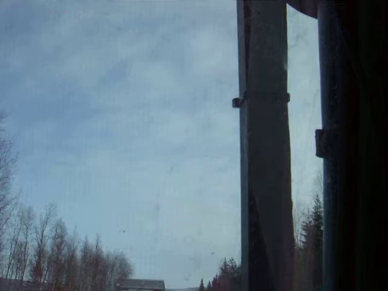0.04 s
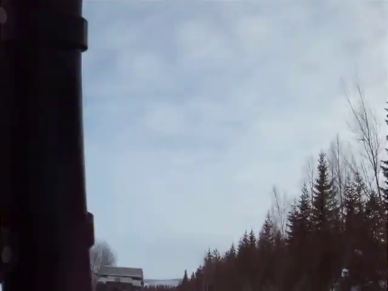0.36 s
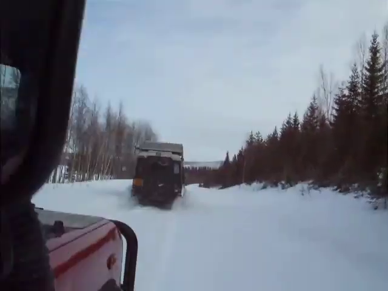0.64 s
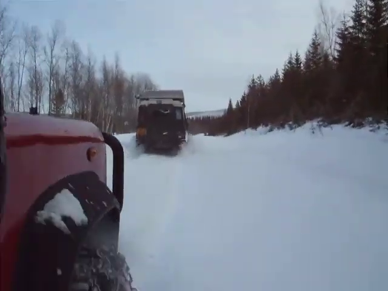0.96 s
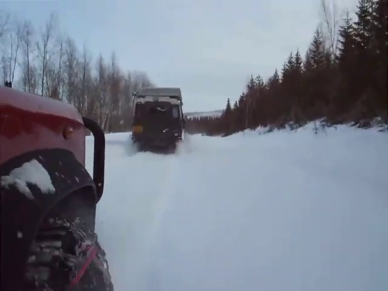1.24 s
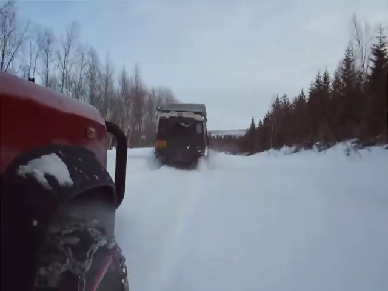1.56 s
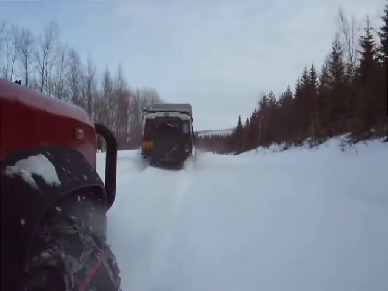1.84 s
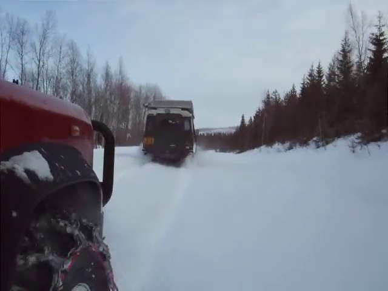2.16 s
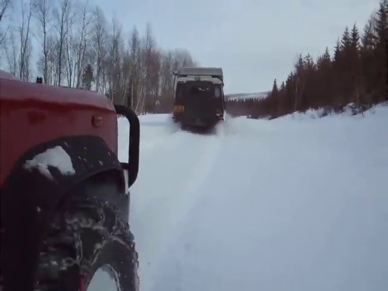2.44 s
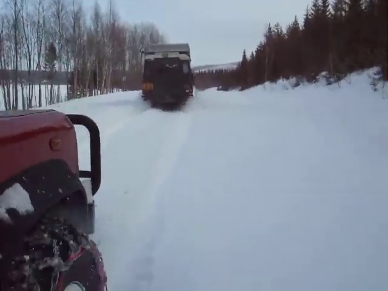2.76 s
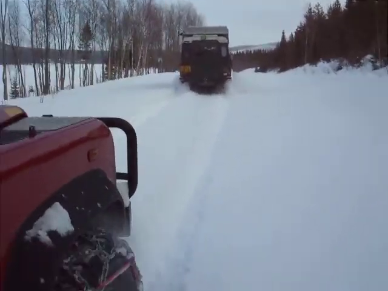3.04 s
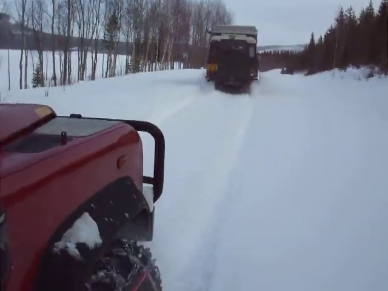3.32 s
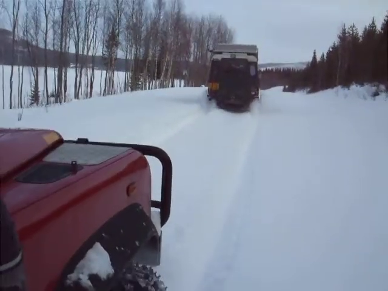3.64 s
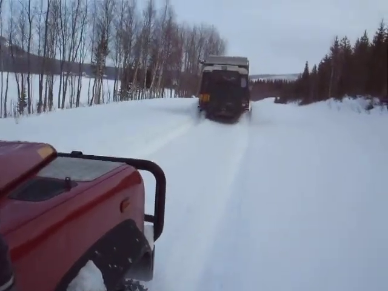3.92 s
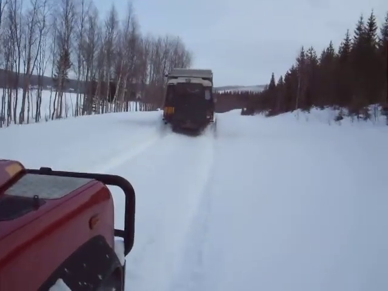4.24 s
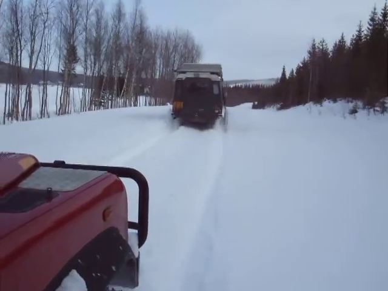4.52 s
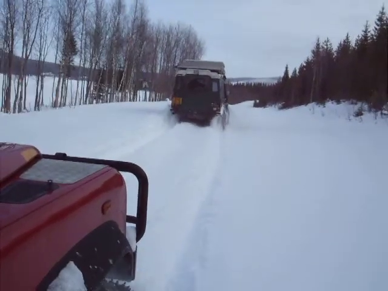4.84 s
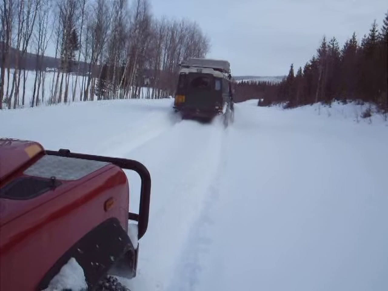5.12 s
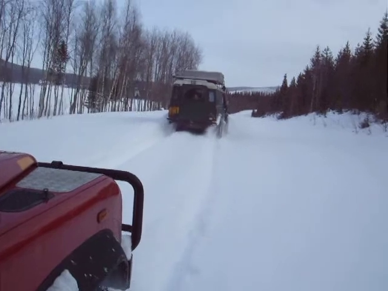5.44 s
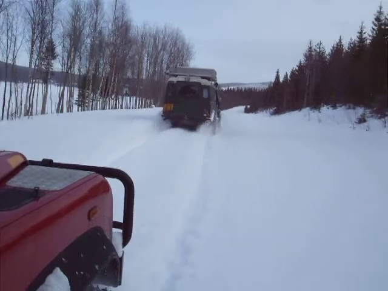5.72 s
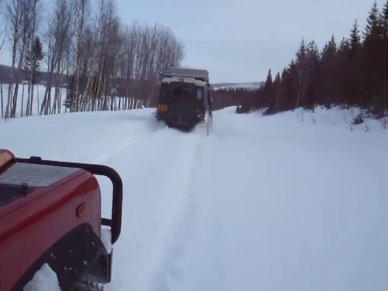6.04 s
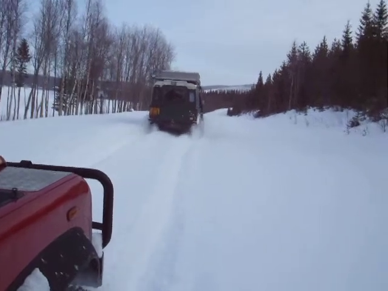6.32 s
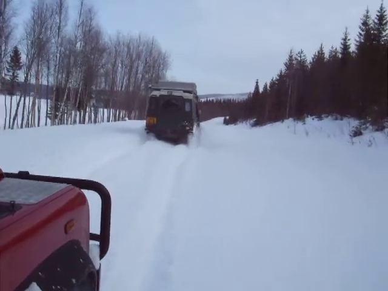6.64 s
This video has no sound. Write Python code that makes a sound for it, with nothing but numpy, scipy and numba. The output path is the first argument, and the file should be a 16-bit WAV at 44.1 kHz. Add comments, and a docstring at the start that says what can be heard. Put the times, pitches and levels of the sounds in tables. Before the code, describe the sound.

At the open window of an off-road vehicle on a snowy track, a diesel engine hums and rattles steadily, wavering against the low tone of a truck ahead. A sharp tick comes first, then a rush of air and heavy wind buffeting on the microphone. As the gusts thin out, the engine drops a little in pitch and works harder, and the hiss of snow thrown by chained tyres builds.

```python
"""In deep snow, at the open side window of a five-cylinder diesel off-roader that drones along.
The periodic firing gives an exhaust hum, which beats against the tone of a truck ahead.
Knocks excite the modes of the engine block, the gears whine faintly and chained tyres spray snow.
Turbulent air rushes past the window frame and buffets the microphone, whose limiter ducks the rest.
A few sharp ticks and two faint, very high clicks are also heard."""
import sys
import numpy as np
from scipy import signal
from scipy.fft import rfft, irfft
from scipy.io import wavfile
from scipy.ndimage import uniform_filter1d
from numba import njit

SR = 44100
rng = np.random.default_rng(int(sys.argv[2]) if len(sys.argv) > 2 else 0)


def transcribe(signal):
    """Save signal, clipped to [-1, 1], as a 16-bit WAV file at the path in sys.argv[1]."""
    frames = np.atleast_2d(signal).T
    limited = np.clip(frames, -1, 1)
    pcm = np.round(limited * 32767).astype(np.int16)
    wavfile.write(sys.argv[1], SR, pcm)


N = 294588
TIME = np.arange(N) / SR


def undb(db):
    """Decibels to amplitude ratio."""
    return 10 ** (np.asarray(db) / 20)


def unit(x):
    """Normalisation to rms 1."""
    return x / np.sqrt(np.mean(x ** 2))


def curve(table):
    """Linear interpolation of (time_s, value) points at every sample."""
    return np.interp(TIME, *np.transpose(table))


def colour(x, spectrum):
    """Spectral shaping by (frequency_hz, gain_db) points, normalised to rms 1."""
    hz, db = np.transpose(spectrum)
    bins_hz = np.maximum(np.arange(N // 2 + 1) * SR / N, 1)
    gain = undb(np.interp(np.log(bins_hz), np.log(hz), db))
    return unit(irfft(rfft(x) * gain, N))


def resonate(x, hz, width_hz):
    """A damped resonator with gain 1 at its centre."""
    return signal.lfilter(*signal.iirpeak(hz, hz / width_hz, fs=SR), x)


def wander(rate_hz):
    """Random modulation: smoothed steps with rms 1."""
    hold = max(int(SR / rate_hz), 1)
    steps = np.repeat(rng.standard_normal(N // hold + 1), hold)[:N]
    return unit(uniform_filter1d(uniform_filter1d(steps, hold), hold))


def swell(peak_s, rise_s, fall_s):
    """A Gaussian envelope of height 1 with separate widths for its rise and fall."""
    width_s = np.where(TIME < peak_s, rise_s, fall_s)
    return np.exp(-np.minimum(((TIME - peak_s) / width_s) ** 2, 40))


def swing(centre_s, hz, spread_rad=0.93):
    """A rarefaction and a compression with peak 1; a wider spread adds overshoot."""
    phase = np.clip(2 * np.pi * hz * (TIME - centre_s), -20, 20)
    wave = np.sin(phase) * np.exp(-(phase / spread_rad) ** 2 / 2)
    return wave / wave.max()


def exhaust(cycle, waver_db=1.5, upper_db=-3):
    """Harmonic series: a strong firing tone, and weaker lines from the unequal cylinders."""
    # exhaust lines, the firing tone first: cycle_multiple, relative_db
    harmonics = [(5, 0.0), (9, -13.5), (10, -7.5), (11, -14.5), (13, -22), (16, -19), (20, -16.5),
                 (23, -13.5), (25, -16), (26, -15), (28, -19.5), (30, -16.5), (31, -26), (34, -15),
                 (42, -22), (43, -23.5), (44, -25), (46, -15)]
    # silencer response for the upper lines: frequency_hz, gain_db
    silencer = [(100, -2.5), (145, -1), (168, 2.5), (200, -1.5), (360, -2), (715, -0.5), (770, -14.5),
                (1200, -33)]
    # firing tone, following the throttle: time_s, level_db
    hum_levels = [(0, -30), (1.4, -26.5), (2.3, -29.5), (3.1, -29.5), (4.1, -30), (5.9, -27.5),
                  (6.68, -26.5)]
    level_db = curve(hum_levels)
    (firing, _), *upper = harmonics
    hum = np.sqrt(2) * np.cos(2 * np.pi * firing * cycle) * undb(level_db + 0.72 * wander(11))
    lines = sum(undb(db + waver_db * wander(6)) * np.cos(2 * np.pi * (multiple * cycle + rng.random()))
                for multiple, db in upper)
    return hum + colour(lines, silencer) * undb(upper_db + level_db.mean())


def rattle(cycle, repeat_share, points=2048):
    """Partly periodic contact noise: a share of its power recurs on every engine cycle."""
    pattern = np.interp(cycle % 1 * points, np.arange(points), rng.standard_normal(points))
    return np.sqrt(repeat_share) * unit(pattern) + np.sqrt(1 - repeat_share) * rng.standard_normal(N)


def clatter(cycle, cylinders=5):
    """Impact noise: each firing shakes the engine bay, and the valves seat twice as often."""
    # clatter spectrum: frequency_hz, gain_db
    spectrum = [(90, -28), (170, -4), (260, -4), (380, -1), (660, -2), (800, -9), (1200, -7), (1600, -4.5),
                (2100, -15.5), (3400, -17), (6000, -35.5)]
    since_firing = (cycle * cylinders + 0.1) % 1
    since_valve = (2 * cycle * cylinders + 0.7) % 1
    bursts = 0.98 + 0.45 * np.exp(-since_firing / 0.2) + 0.7 * np.exp(-since_valve / 1.2)
    return colour(bursts * rattle(cycle, repeat_share=0.58), spectrum)


def block(cycle, glide_hz=25, scatter_db=1.3, grit=0.06, contact_cycles=0.012):
    """Modal ringing: injection and valve knocks at fixed crank angles excite the engine block."""
    # knocks within one engine cycle: cycle_fraction, force_db
    knocks = [(.021, -9.5), (.073, -4.5), (.094, -2.5), (.177, -2), (.239, -4.5), (.322, -11), (.503, -10),
              (.678, -4), (.792, -10), (.876, -5)]
    # modes of the block: frequency_hz, width_hz, gain_db
    modes = [(1458, 115, 7.5), (1600, 81, -11.5), (1035, 32, -3.5), (700, 31, 8), (385, 29, 9.5),
             (3370, 65, 0.5)]
    turn = np.floor(cycle).astype(int)
    blows, contact = np.zeros(N), np.zeros(N)
    for place, db in knocks:
        force = undb(db + scatter_db * rng.standard_normal(turn[-1] + 1))[turn]
        since_knock = (cycle - place) % 1
        blows += force * (np.diff(since_knock, prepend=0) < -0.5)
        contact += force * np.exp(-since_knock / contact_cycles)
    push = blows + grit * contact * rattle(cycle, repeat_share=0.79)
    # the casing takes a moment to pass each knock on, which rounds its attack
    push = resonate(push, hz=1466, width_hz=670)
    ring = sum(undb(db) * resonate(push, hz, width_hz) for hz, width_hz, db in modes)
    # the pitch slides up through the hardest knocks: a chirp, glide_hz either side of the first mode
    slide = glide_hz / modes[0][0] * np.sin(2 * np.pi * (cycle - 0.14))
    return unit(np.interp(TIME + np.cumsum(slide) / SR, TIME, ring))


def gears(cycle, waver_db=3.0, slip_periods=0.2):
    """Meshing tones locked to the crank; play in the drive modulates their amplitude and phase."""
    # timing gears and belt drives: cycle_multiple, level_against_ring_db
    whines = [(69, -16), (85, -18.5), (105, -14.5), (224, -22.5)]
    sound = np.zeros(N)
    for multiple, db in whines:
        amplitude = np.sqrt(2) * undb(db + waver_db * wander(5))
        sound += amplitude * np.sin(2 * np.pi * (multiple * cycle + slip_periods * wander(11)))
    return sound


def engine(cycle, mean_clatter_db=-30.5, clatter_db_per_db=0.28):
    """Superposition of exhaust, clatter, block and gears; the last three grow with the load."""
    # engine load, heard as the ring of the block: time_s, level_db
    load = [(0, -55.5), (.3, -48.5), (.62, -30), (.8, -36), (2.0, -36.5), (3.4, -33), (4.1, -28),
            (4.55, -32.5), (5.9, -29.5), (6.68, -30.5)]
    load_db = curve(load)
    clatter_db = mean_clatter_db + clatter_db_per_db * (load_db - load_db.mean())
    drone = exhaust(cycle) + clatter(cycle) * undb(clatter_db)
    return drone + (block(cycle) + gears(cycle)) * undb(load_db)


def truck(waver_db=3.8):
    """Propagation over snow: only the firing tone of the truck ahead carries, wavering on the way."""
    # its firing rate: time_s, pitch_hz
    pitches = [(0, 67.73), (1.8, 68.41), (2.6, 72.41), (3.2, 68.13), (4.0, 64.7), (6.68, 68.27)]
    # how well its drone carries: time_s, level_db
    levels = [(0, -32), (.7, -50.5), (2.6, -40), (4.6, -36), (6.68, -44)]
    amplitude = np.sqrt(2) * undb(curve(levels) + waver_db * wander(4.3))
    return amplitude * np.sin(2 * np.pi * np.cumsum(curve(pitches)) / SR)


def spray(cycle, grain_db=1.1, flutter_db=0.5, throb=0.15, cylinders=5):
    """Amplitude-modulated noise: snow grains thrown by the chained tyres, mixed with engine hiss."""
    # hiss spectrum: frequency_hz, gain_db
    spectrum = [(200, -12), (600, 4), (1700, 3), (2100, 0), (2600, 3), (3000, 0), (3400, 2.5), (3900, 0),
                (4400, 3), (5000, 0.5), (5500, -10.5), (6000, -24)]
    # snow thrown by the tyres: time_s, level_db
    levels = [(0, -38.5), (2.2, -39), (3.2, -33), (6.68, -29.5)]
    grains = rng.standard_normal(N) * undb(grain_db * wander(1500) + flutter_db * wander(33))
    # the hiss throbs with each firing and once a cycle
    pulse = throb * np.cos(2 * np.pi * (cylinders * cycle + 0.51)) - 0.11 * np.cos(2 * np.pi * cycle)
    return colour(grains * (1 + pulse), spectrum) * undb(curve(levels))


def airflow():
    """Turbulence amplitude at the microphone: breeze and gusts are incoherent, so their powers add."""
    # steady flow: time_s, level_db
    breeze = [(0, -32), (2.2, -32), (3.2, -38.5), (6.68, -42.5)]
    # gusts: peak_s, half_length_s, level_db
    gusts = [(0.756, 0.14, -22), (0.935, .05, -18), (1.045, 0.03, -18), (1.289, 0.081, -16.5),
             (1.466, 0.051, -14), (1.66, 0.046, -24.5), (1.943, .03, -23), (2.073, 0.059, -27),
             (2.344, 0.11, -28.5), (2.842, 0.063, -26), (4.381, .04, -21.5), (4.992, .03, -28.5),
             (6.048, 0.061, -29), (6.518, 0.2, -25.5)]
    gust_power = sum((undb(db) * swell(peak_s, half_s, half_s)) ** 2 for peak_s, half_s, db in gusts)
    return np.sqrt(undb(curve(breeze)) ** 2 + gust_power)


def wind_rumble(flow, flutter_db=3):
    """Turbulent pressure fluctuations on the microphone, strongest at low frequencies."""
    # turbulence spectrum: frequency_hz, gain_db
    spectrum = [(15, -15.5), (30, -2.5), (60, 0.5), (120, 0), (250, -7), (400, -14.5), (700, -26),
                (1500, -36.5), (4000, -68)]
    return flow * colour(rng.standard_normal(N) * undb(flutter_db * wander(45)), spectrum)


def window_rush(flutter_db=1.1, floor_db=-51, fall_s=0.045):
    """Flow noise round the window frame: a faint floor, with surges that build and then die fast."""
    # spectrum of the rushing air: frequency_hz, gain_db
    spectrum = [(150, -10.5), (400, 1), (700, 6.5), (1050, -7), (1550, -2), (2050, -1.5), (2500, -4),
                (3500, -6.5), (6000, -23.5)]
    # surges: peak_s, rise_s, level_db
    surges = [(.66, 0.39, -28), (.87, .05, -33), (1.19, 0.14, -35)]
    rush = colour(rng.standard_normal(N) * undb(flutter_db * wander(40)), spectrum)
    surging = sum(undb(db) * swell(peak_s, rise_s, fall_s) for peak_s, rise_s, db in surges)
    return rush * (undb(floor_db) + surging)


def eddies(flow, rate_per_s=60, pitch_hz=174, above_flow_db=3.5, scatter_db=2.5):
    """A Poisson process: small eddies arrive at random, with pressure swings that scale with the flow."""
    arrivals = rng.random(N) < rate_per_s / SR
    sizes = flow * undb(above_flow_db + scatter_db * rng.standard_normal(N))
    pulse = swing(TIME[N // 2], pitch_hz, spread_rad=1.9)
    return signal.fftconvolve(arrivals * sizes, pulse, mode="same")


def ticks():
    """Impulsive transients: a few sharp ticks, one pressure swing each."""
    # ticks: time_s, peak_db, pitch_hz
    taps = [(0.186, 1, 1260), (.1861, 19, 3250), (5.3109, -5, 900)]
    return sum(undb(db) * swing(time_s, hz) for time_s, db, hz in taps)


def high_clicks(pitch_hz=5800):
    """Two brief, faint, very high clicks; so short a pulse has a broad spectrum."""
    # clicks: time_s, peak_db
    clicks = [(.186, -15.5), (6.4914, -19)]
    return sum(undb(db) * swing(time_s, pitch_hz) for time_s, db in clicks)


def buffets(wake_s=0.01, wake_db=-16.0, swing_db=-2.0):
    """Vortex impact: each big eddy thumps the microphone with a pressure swing in a churning wake."""
    # big eddies: time_s, relative_db, pitch_hz
    thumps = [(.702, -0.5, 253), (0.743, -.5, 267), (0.779, -6.5, 244), (0.903, -3.5, 170),
              (0.916, -2.5, 250), (0.946, -1.5, 262), (1.008, -9, 700), (1.024, -6, 450), (1.034, 3, 290),
              (1.245, -7.5, 255), (1.297, 3.5, 288), (1.319, -4, 208), (1.432, -2, 224), (1.483, -2, 290),
              (1.951, -4.5, 530), (2.1, -8.5, 239), (2.108, -8, 450), (2.872, -7.5, 260), (3.753, -10, 196),
              (4.392, -12, 200)]
    swings = sum(undb(db) * swing(time_s, hz, spread_rad=1.72) for time_s, db, hz in thumps)
    wakes = sum(undb(db) * np.exp(-np.minimum(np.abs(TIME - time_s) / wake_s, 20))
                for time_s, db, _ in thumps)
    churn = resonate(rng.standard_normal(N), hz=310, width_hz=180)
    churn = unit(resonate(churn, hz=340, width_hz=350))
    return undb(swing_db) * swings + undb(wake_db) * wakes * churn


def scene(cylinders=5):
    """Superposition at the side window: the engine, the truck ahead, snow, wind and ticks."""
    # engine speed, sagging as the snow deepens and then partly recovering: time_s, firing_hz
    firing_rates = [(0, 86.07), (0.5, 84.63), (1.6, 84.45), (2.4, 76.49), (3.0, 75.36), (4.1, 73.84),
                    (4.6, 75.27), (5.7, 76.57), (6.68, 78.48)]
    cycle = np.cumsum(curve(firing_rates)) / SR / cylinders  # four-stroke cycles elapsed
    flow = airflow()
    snow = spray(cycle)
    vehicles = engine(cycle) + truck()
    wind = wind_rumble(flow) + window_rush() + eddies(flow) + buffets()
    return (vehicles + snow + wind + ticks())[None]


@njit
def follow(rectified, attack_s, release_s):
    """Envelope detection with separate time constants for rise and fall."""
    envelope, level = np.empty(len(rectified)), 0.
    for i in range(len(rectified)):
        lag_s = attack_s if rectified[i] > level else release_s
        level += (rectified[i] - level) / (lag_s * SR)
        envelope[i] = level
    return envelope


def lowpass(x, hz):
    """An elliptic filter with a steep cut above hz."""
    return signal.sosfilt(signal.ellip(8, 0.2, 80, hz, fs=SR, output="sos"), x)


def record(dry, attack_s=0.0045, release_s=0.046, threshold_db=-13, start_s=0.0715):
    """Limiting, clipping and a treble cut, after a moment of silence; two high clicks are also heard."""
    envelope = follow(np.abs(dry[0]), attack_s, release_s)
    gain = undb(threshold_db) / np.maximum(envelope, undb(threshold_db))
    clipped = np.clip(dry * gain, -0.7, 0.7)
    sound = lowpass(clipped * (TIME > start_s), hz=5750)
    return lowpass(sound + high_clicks(), hz=16000)


dry = scene()
out = record(dry)
transcribe(out)
```